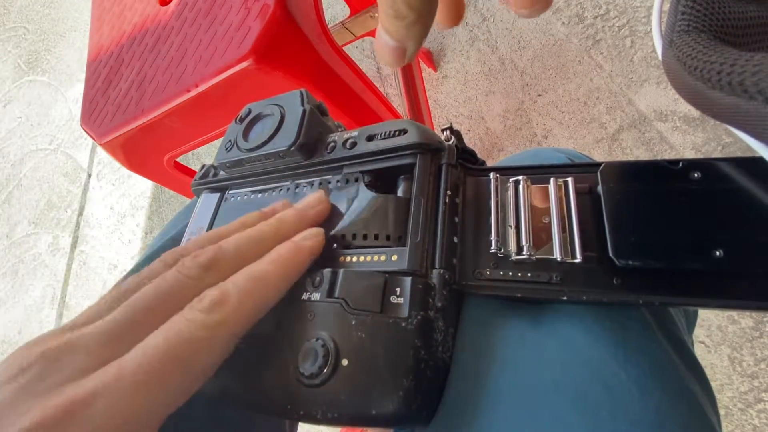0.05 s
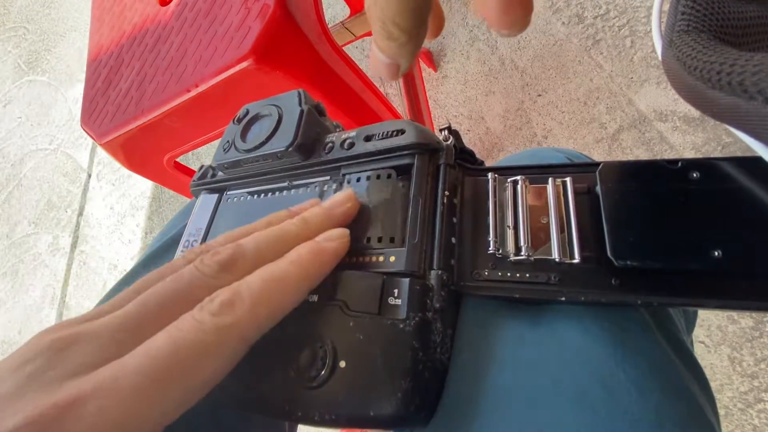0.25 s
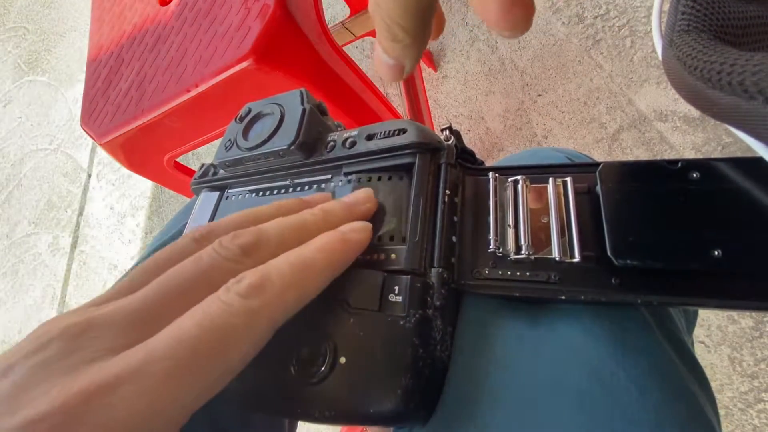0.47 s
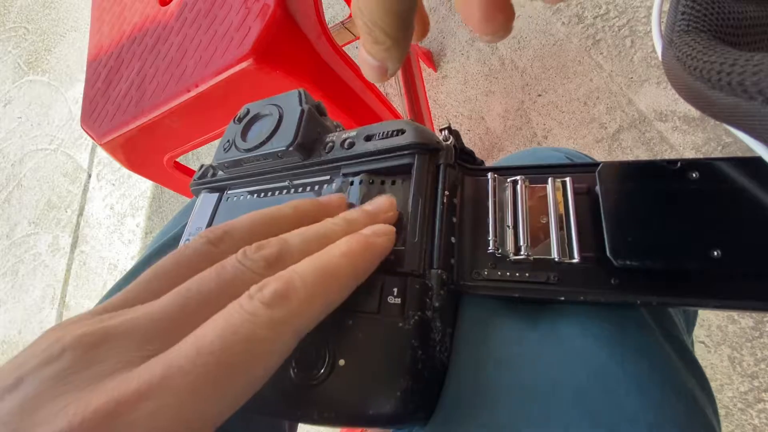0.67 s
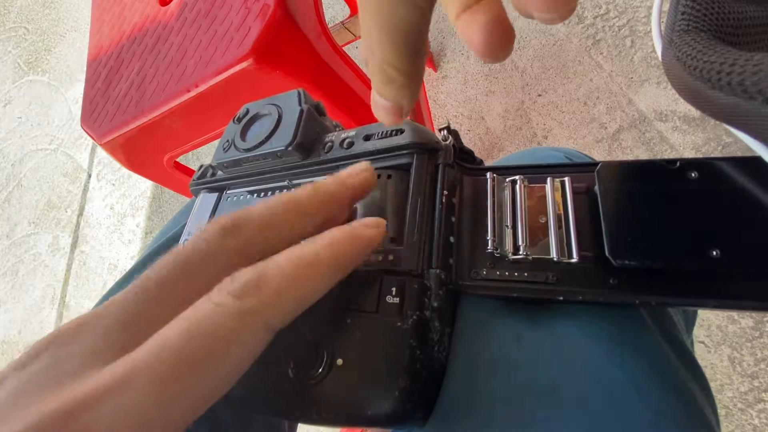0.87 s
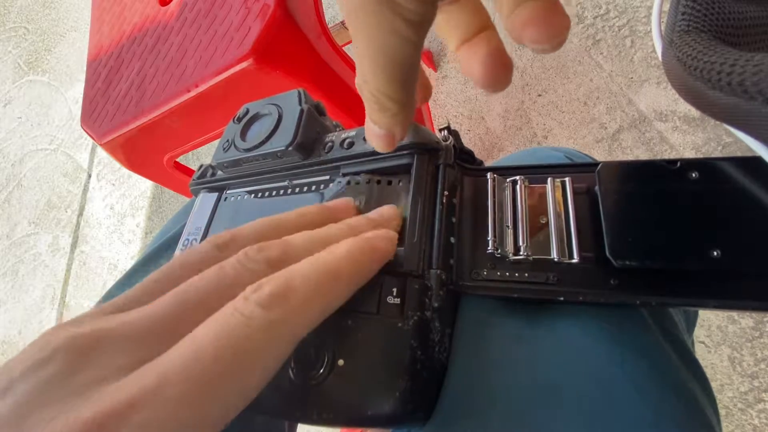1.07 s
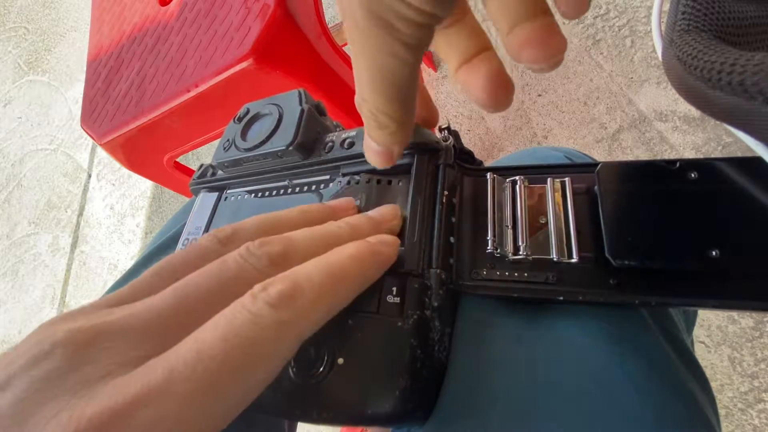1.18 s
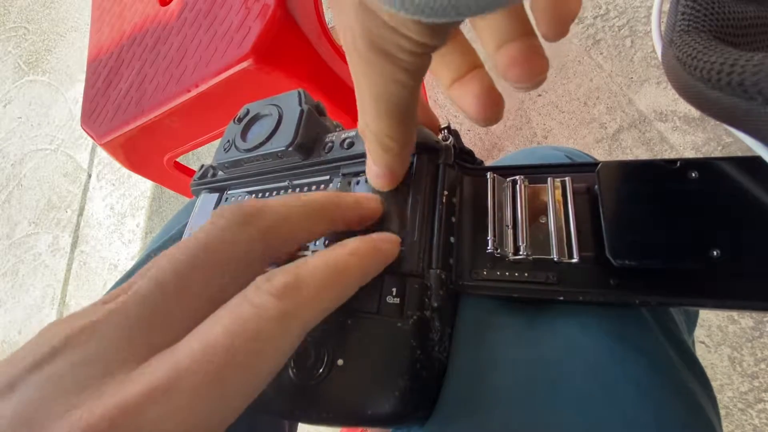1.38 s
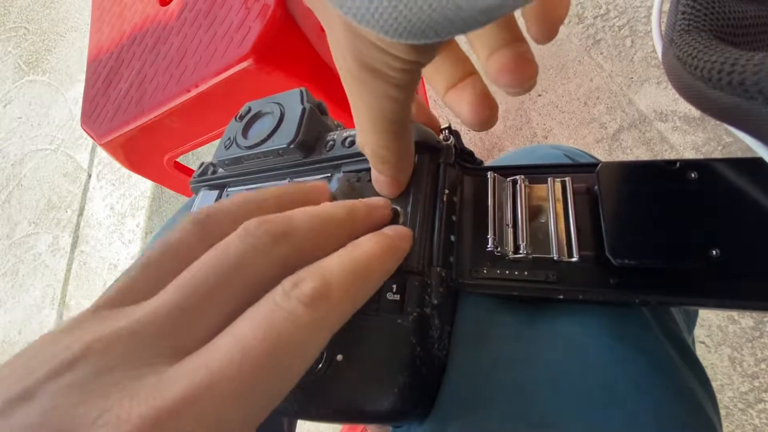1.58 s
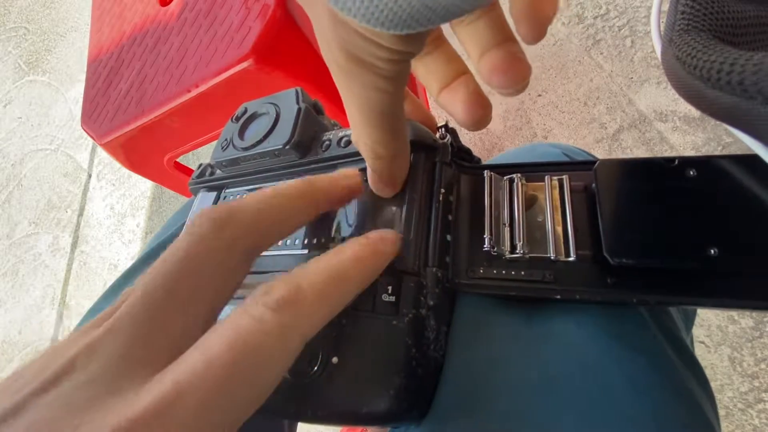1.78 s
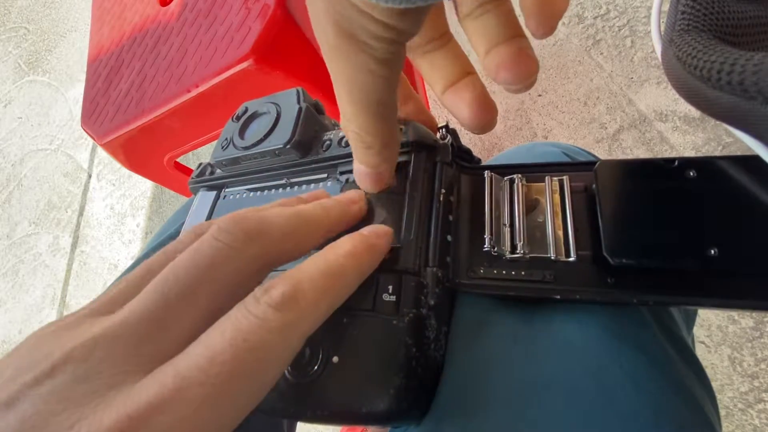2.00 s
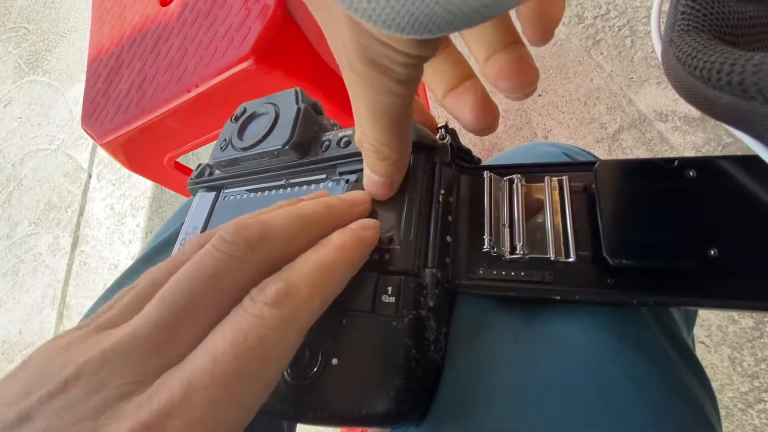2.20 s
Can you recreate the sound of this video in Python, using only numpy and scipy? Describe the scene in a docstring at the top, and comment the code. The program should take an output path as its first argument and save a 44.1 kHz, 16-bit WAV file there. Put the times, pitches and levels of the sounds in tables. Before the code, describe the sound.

One sharp snap of film being loaded into a camera, then faint ticking and handling thuds.

```python
"""Faint ticks in a quiet room come first, then one sharp snap as film pops into place in a camera.
The film is being threaded: its edge goes on ticking and scraping along the guides, and the camera body
rings briefly. Hands brush the camera and bump it with dull thuds. It lies open on a lap, close to a
microphone with two ports (openings), one for the left and one for the right."""
import sys
import numpy as np
from scipy import signal
from scipy.fft import rfft, irfft
from scipy.io import wavfile
from scipy.ndimage import uniform_filter1d

SR = 44100
rng = np.random.default_rng(int(sys.argv[2]) if len(sys.argv) > 2 else 0)


def store_wav(level_fs):
    """Save 16-bit WAV to argv[1]."""
    pcm = np.round(np.clip(np.atleast_2d(level_fs), -1, 1) * 32767)
    wavfile.write(sys.argv[1], SR, pcm.T.astype(np.int16))


N = 99225
TIME = np.arange(N) / SR


def amp(db):
    """Turns decibels into a factor to multiply by."""
    return 10 ** (np.asarray(db) / 20)


def unit_level(x):
    """Scales a signal to an average strength (rms) of 1."""
    return x / np.sqrt(np.mean(x ** 2) + 1e-30)


def look_up(points, hz):
    """Reads between the rows of a table, on a log-frequency scale."""
    f, value = np.transpose(points)
    return np.interp(np.log(hz + 1), np.log(f + 1), value)


def add(mix, start_s, sound):
    """Mixes a sound in at the given time."""
    part = mix[max(round(start_s * SR), 0):][:len(sound)]
    part += sound[:len(part)]


def coloured(x, colour, lag=1):
    """Gives a sound a tone colour. Ringing is centred on each contact at lag 0 and follows it at lag 1."""
    hz = abs(np.fft.fftfreq(len(x), 1 / SR))
    log_gain = np.log(amp(look_up(colour, hz)))
    phase = -lag * signal.hilbert(log_gain).imag
    return np.fft.ifft(np.fft.fft(x) * np.exp(log_gain + 1j * phase)).real


def stroke_level(rows):
    """Loudness over time of movements that each swell to a peak and fade."""
    strokes = (amp(db) * np.exp(-np.maximum((peak_s - TIME) / swell, (TIME - peak_s) / fade))
               for peak_s, db, swell, fade in rows)
    return np.sqrt(sum(stroke ** 2 for stroke in strokes))


def drifting_noise(colour, drift_db):
    """Noise in which patches of low and high sound drift louder and softer."""
    hz, _, spectra = signal.stft(rng.standard_normal(N), SR, nperseg=2048, noverlap=1536)
    patches = uniform_filter1d(rng.standard_normal(spectra.shape), size=5, axis=0)
    patches = unit_level(uniform_filter1d(patches, size=8, axis=1))
    spectra *= amp(look_up(colour, hz)[:, None] + drift_db * patches)
    return unit_level(signal.istft(spectra, SR, nperseg=2048, noverlap=1536)[1][:N])


# Tone colours of the room's rumble and of its soft wash: f/Hz, level/dB
RUMBLE_COLOUR = [(15, -36.5), (30, -18), (48, 0.5), (70, 6), (105, -4), (145, -8), (185, -20.5),
                 (260, -19.5), (380, -24.5), (520, -29.5), (820, -25.5), (1100, -39.5), (2000, -34),
                 (3000, -45.5), (5500, -38.5), (7300, -52.5), (11000, -52.5), (13000, -63), (16000, -70.5)]
WASH_COLOUR = [(20, -11.5), (60, 2.5), (140, 6), (200, -6), (350, 2.5), (500, 1), (750, 0.5), (1100, -10),
               (1700, -17.5), (2200, -20), (3000, -26.5), (5500, -37), (8000, -32.5), (11000, -53.5),
               (13000, -41.5), (16000, -44.5)]
# How loud the two are over time: t/s, rumble level/dB, wash level/dB
ROOM_LEVELS = [(0, -59, -59.5), (0.701, -59.5, -58.5), (1.15, -61, -60), (1.399, -63, -63),
               (1.69, -61, -62.5), (1.79, -57.5, -54.5), (1.88, -59, -58), (2.0, -58, -58.5),
               (2.081, -59, -60), (2.14, -56.5, -56.5), (2.25, -58.5, -57.5)]


def room_tone():
    """The quiet room: a low rumble alike in both ports, and a soft wash that is opposite in them."""
    times, rumble_db, wash_db = np.transpose(ROOM_LEVELS)
    rumble = drifting_noise(RUMBLE_COLOUR, drift_db=3.15) * amp(np.interp(TIME, times, rumble_db))
    wash = drifting_noise(WASH_COLOUR, drift_db=5.0) * amp(np.interp(TIME, times, wash_db))
    return np.array([rumble + wash, rumble - wash])


# How far the wave at the left port is ahead of the right: f/Hz, phase/rad
LEFT_LEAD = [(60, -4), (300, 4.5), (1200, 3), (1900, -1.2), (2300, -1.75), (2800, -1), (3600, -6),
             (6000, -4.5), (6900, -3), (10200, -1), (13400, 3), (16000, 5.5)]
# How much louder the left port is than the right: f/Hz, level/dB
LEFT_BOOST = [(1000, 2.5), (1950, 7.5), (2300, 5), (2700, -4), (3400, 0.5), (4900, -1), (6500, -4),
              (8000, 1), (16000, -1)]


def mic_ports(x):
    """Makes stereo: each port hears the camera with its own level and timing."""
    hz = np.fft.rfftfreq(2 * N, 1 / SR)
    left = amp(look_up(LEFT_BOOST, hz) / 2)
    right = np.exp(-1j * look_up(LEFT_LEAD, hz)) / left
    gains = np.array([left, right]) / np.sqrt((left ** 2 + left ** -2) / 2)  # keeps the total power
    return irfft(rfft(x, 2 * N) * gains)[:, :N]


# How long the room's echo takes to fall by 60 dB: f/Hz, decay/s
ECHO_DECAY = [(500, 0.45), (2000, 0.24), (6000, 0.14), (14000, 0.24)]


def echoes(x, near_db=-22.5, near_decay_s=.005, room_db=-25):
    """Sound bounces quickly off the hands and camera, then leaves a faint, short tail in the room."""
    size = 16384
    t = np.arange(size) / SR
    hz, when, spectra = signal.stft(rng.standard_normal((2, size)), SR, nperseg=256)
    spectra *= amp(-60 * when / look_up(ECHO_DECAY, hz)[:, None])
    tail = signal.istft(spectra, SR, nperseg=256)[1][:, :size] * (t > .008)
    bounces = rng.standard_normal(size) * np.exp(-t / near_decay_s) * (t > .003)
    near = signal.fftconvolve(x, bounces / np.linalg.norm(bounces))[:N]
    far = signal.fftconvolve(x[None], tail / np.linalg.norm(tail[0]), axes=1)[:, :N]
    return amp(near_db) * mic_ports(near) + amp(room_db) * far


# Fingers pressing and brushing on the camera: peak t/s, level/dB, swell/s, fade/s
FINGER_STROKES = [(.7, -70, 0.019, 0.032), (.84, -65, .015, 0.024), (1.135, -63.5, 0.025, 0.016),
                  (1.745, -60, 0.024, .03), (1.81, -55, 0.018, 0.01), (1.935, -65, 0.021, 0.042),
                  (2.142, -57.5, 0.02, 0.016)]
# Tone colour of skin on the shell: f/Hz, level/dB
SKIN_COLOUR = [(60, -5), (140, 6.5), (240, -6), (360, 0.5), (480, -15), (800, -9.5), (1200, -26),
               (3000, -71.5)]


def finger_brushes():
    """Skin rubs the camera shell in muffled puffs, a little to the left."""
    skin = np.array([unit_level(coloured(noise, SKIN_COLOUR)) for noise in rng.standard_normal((2, N))])
    return stroke_level(FINGER_STROKES) * skin * amp([[1.5], [-1.5]])


# Hands bumping the camera: t/s, level/dB, f/Hz, rise/s, decay/s
THUDS = [(0.223, -44, 65.1, 0.005, 0.036), (.68, -47, 69.3, 0.017, .018),
         (0.782, -51.5, 63.9, 0.011, 0.012), (1.11, -44.5, 71, 0.019, 0.028),
         (1.7433, -26.5, 63.2, 0.032, 0.028), (1.808, -30, 60.2, 0.034, 0.032),
         (1.869, -33, 64.9, 0.022, 0.026), (2.165, -50.5, 65, .03, .04)]


def hand_bumps():
    """Each soft push starts a low vibration that soon dies away, a little to the right."""
    out = np.zeros(N)
    for start_s, db, hz, rise, decay in THUDS:
        swell = np.sin(np.pi / 2 * np.minimum(TIME / rise, 1)) ** 2
        fade = np.exp(-np.maximum(TIME - rise, 0) / decay)
        add(out, start_s, amp(db) * swell * fade * np.sin(2 * np.pi * hz * TIME))
    return out * amp([[-1.2], [1.1]])


# Film sliding along the guides: peak t/s, level/dB, swell/s, fade/s
FILM_STROKES = [(.15, -64.5, 0.025, 0.013), (.2, -54, 0.016, 0.031), (.26, -53, .015, 0.015),
                (.295, -59, 0.014, 0.0087), (.51, -58.5, 0.019, 0.029), (0.583, -56.5, 0.0086, 0.0096),
                (.685, -52, 0.014, 0.011), (.882, -59.5, 0.01, 0.019), (1.02, -83.5, 0.0099, .03),
                (1.073, -57.5, 0.019, 0.015), (1.471, -67.5, 0.015, 0.021), (1.564, -74, .02, 0.024),
                (1.79, -68.5, 0.0064, 0.0064), (1.94, -71.5, .01, 0.0058), (2.175, -73, 0.026, 0.01)]
# Tone colour of the camera body when rubbed: f/Hz, level/dB
SCRAPE_COLOUR = [(200, -19), (1200, -29), (1650, -13.5), (2050, 3), (2350, 0.5), (2700, -2), (4000, -10.5),
                 (5700, -2.5), (6500, 0), (7300, -6.5), (8800, -6), (11500, -13), (13000, -21),
                 (15800, -21.5)]


def film_scrapes(grains_per_s=2900, spread_db=3, hiss_gain=0.23):
    """Sliding film sticks and slips, making a stream of tiny grains of sound with a little hiss."""
    grains = rng.standard_normal(N) * amp(spread_db * np.minimum(rng.exponential(1, N), 4))
    grains *= rng.random(N) < grains_per_s / SR
    friction = unit_level(grains) + hiss_gain * rng.standard_normal(N)
    return stroke_level(FILM_STROKES) * unit_level(coloured(friction, SCRAPE_COLOUR))


RING_TOP_HZ, CLACK_TOP_HZ = 2620, 7000  # a click has three bands: low ring, middle clack, high treble
CLACK_PEAK_DB, CLACK_WIDTH_HZ = 8.5, 420
DULL_HZ, DULL_SHARE = 13500, 1.6  # clicks with little treble lose even more above this frequency


def clicks(rows, body_colour, impact):
    """Each click is one hit and a brief chatter of tiny contacts that make the camera body ring."""
    size, lead_s, impact_rise_s = 4096, .015, .001
    t = (np.arange(size) - round(lead_s * SR)) / SR
    hz = np.fft.rfftfreq(size, 1 / SR)
    below_treble = 1 / (1 + (hz / CLACK_TOP_HZ) ** 16)
    below_clack = 1 / (1 + (hz / RING_TOP_HZ) ** 16)
    bands = (below_clack, below_treble - below_clack, 1 - below_treble)
    out = np.zeros(N)
    for hit_s, ring_db, clack_db, treble_db, rise, decay, clack_hz in rows:
        chatter = rng.standard_normal(size) * np.exp(-np.maximum(-t / rise, t / decay))
        hit = (t == 0) * impact * np.exp(-rise / impact_rise_s)  # weaker in clicks that rise slowly
        burst = rfft(chatter / np.linalg.norm(chatter) + hit)
        burst /= np.sqrt(uniform_filter1d(abs(burst) ** 2, size=110))  # evens out chance peaks and dips
        burst *= amp(CLACK_PEAK_DB / (1 + ((hz - clack_hz) / CLACK_WIDTH_HZ) ** 2))
        burst *= amp(DULL_SHARE * min(treble_db - clack_db, 0) / (1 + (DULL_HZ / (hz + 1)) ** 20))
        ringing = rfft(coloured(irfft(burst), body_colour, lag=0.41))
        click = sum(amp(db) * unit_level(irfft(ringing * band))
                    for db, band in zip((ring_db, clack_db, treble_db), bands))
        add(out, hit_s - lead_s, click * np.sqrt(.001 * SR / size))  # levels count as if it lasted 1 ms
    return out


# Ticks of the film: t/s, ring level/dB, clack level/dB, treble level/dB, rise/s, decay/s, clack f/Hz
EDGE_TICKS = [(.0252, -71, -56.5, -63.5, 0.00027, 0.0012, 6100),
              (.0841, -59.5, -58, -64.5, .0003, 0.0028, 5200),
              (.1495, -49.5, -48.5, -51, 0.00027, 0.0045, 2690),
              (.2283, -36.5, -33.5, -57.5, .0003, 0.0014, 4980),
              (.3748, -59.5, -64.5, -71, .0002, 0.0014, 6450),
              (.3838, -67, -69.5, -70, .0003, 0.0015, 2900), (.3986, -62, -65, -69, .0005, 0.003, 6000),
              (.4515, -63, -54.5, -57.5, .0002, 0.0025, 6480),
              (.4566, -50.5, -61, -62, .0005, 0.0028, 6540), (.4736, -67, -52.5, -57.5, .0012, .002, 6200),
              (.5226, -37, -44.5, -42, 0.00018, 0.0042, 3000),
              (.5862, -54.5, -56.5, -49, 0.00037, 0.00092, 6600),
              (.657, -43.5, -46.5, -39, 0.0016, .002, 2900),
              (.6702, -25.5, -42, -46.5, 0.00022, 0.0015, 3180),
              (.6996, -55, -50.5, -57, 0.0011, 0.004, 3030), (.7466, -58, -60, -66, 0.00076, 0.0033, 2870),
              (.7968, -44.5, -46, -48, 0.00044, 0.001065, 3220),
              (.8714, -55, -56.5, -74, 0.0014, 0.0022, 3320), (.8803, -57, -55, -48.5, 0.00083, .003, 5350),
              (.8854, -60, -49.5, -43, .0003, 0.00073, 6470),
              (.907, -52, -49.5, -49.5, 0.0013, 0.0021, 3330),
              (1.0072, -51.5, -56, -60, 0.00035, .003, 3000), (1.0195, -50, -53.5, -54, .002, 0.0019, 2900),
              (1.0267, -43, -50, -56.5, .0002, 0.0011, 3000),
              (1.0785, -41, -41, -40.5, 0.0023, 0.0024, 2966),
              (1.2853, -61.5, -64, -67, 0.00042, 0.0011, 5800),
              (1.2933, -57.5, -59, -60.5, 0.0014, 0.0042, 4610),
              (1.3084, -56, -61.5, -69, 0.00057, 0.0026, 3700),
              (1.3642, -56.5, -49, -45.5, 0.000095, 0.00057, 6500),
              (1.4545, -62, -65, -60, .0002, 0.00085, 6600), (1.4603, -62.5, -44, -49, 0.0014, .0017, 6600),
              (1.486, -63, -61, -69, 0.00035, 0.0027, 5750),
              (1.491, -61.5, -64, -72.5, .0004, 0.0025, 5820),
              (1.5524, -70, -62.5, -69, 0.00083, 0.0013, 5440),
              (1.5758, -82, -63.5, -66.5, 0.00023, 0.0011, 6190),
              (1.6462, -86, -55.5, -71, 0.00023, 0.001, 6050),
              (1.6531, -72.5, -63, -65, 0.00029, .0017, 5300),
              (1.779, -38, -46.5, -54.5, 0.00083, 0.0022, 4920),
              (1.871, -48.5, -47.5, -57.5, 0.00035, 0.0016, 3200),
              (1.9289, -47, -47, -57.5, 0.0008, 0.0012, 5800),
              (2.1143, -53.5, -58.5, -71, 0.00028, 0.00084, 5350),
              (2.1378, -60, -54.5, -61.5, 0.00031, 0.0013, 6140)]
# Tone colour of the camera body when tapped: f/Hz, level/dB
TICK_COLOUR = [(100, -21), (800, -29), (1200, -37.5), (1760, -25), (2030, 4.5), (2320, -2), (2620, -21),
               (3050, 3), (3800, -10.5), (4900, -3), (6400, -1), (7200, -6), (8500, -3), (11000, -9),
               (13500, -15), (15600, -15.5), (16500, -27)]


def film_ticks():
    """The edge of the film taps against the guides."""
    return clicks(EDGE_TICKS, TICK_COLOUR, impact=0.92)


# The snap and its rebound: t/s, ring level/dB, clack level/dB, treble level/dB, rise/s, decay/s, clack f/Hz
SNAP_HITS = [(.2363, -20, -15, -19, 0.00012, 0.0022, 4672),
             (.2399, -29, -29.5, -20, 0.000087, 0.0011, 5750)]
# Tone colour of the camera body in the snap: f/Hz, level/dB
SNAP_COLOUR = [(100, -19), (750, -18.5), (1200, -35.5), (1750, -25.5), (2020, 5), (2330, 7.5), (2600, -13),
               (3100, 3), (3500, -15.5), (4900, -4.5), (5550, -5), (6400, 6.5), (7300, -5), (9000, -0.5),
               (10800, -1.5), (12600, -2), (13400, -10.5), (15000, -16), (15600, -7.5), (16400, -30)]


def film_snap():
    """The film snaps into place and bounces once."""
    return clicks(SNAP_HITS, SNAP_COLOUR, impact=0.34)


def scene():
    """Film, hands and camera in the quiet room."""
    film = film_snap() + film_ticks() + film_scrapes()
    return mic_ports(film) + echoes(film) + hand_bumps() + finger_brushes() + room_tone()


def record(dry):
    """Cuts away the very highest treble, above 16300 Hz."""
    low_pass = signal.firwin(511, 16300, window=("kaiser", 9), fs=SR)
    return signal.oaconvolve(dry, low_pass[None], "same")


dry = scene()
out = record(dry)
store_wav(out)
```